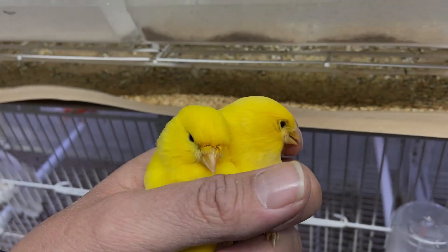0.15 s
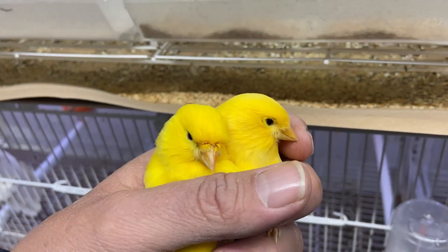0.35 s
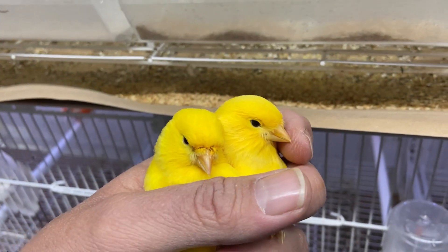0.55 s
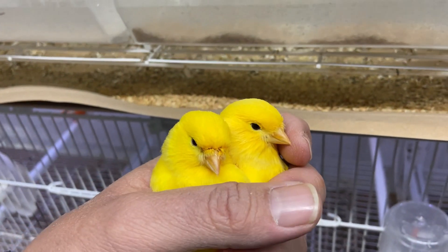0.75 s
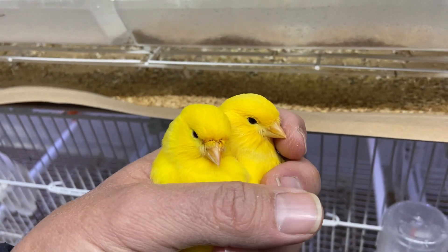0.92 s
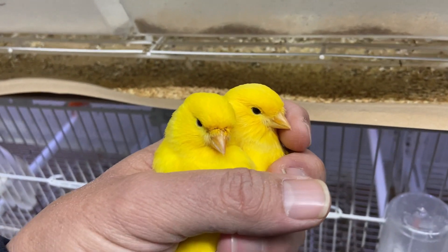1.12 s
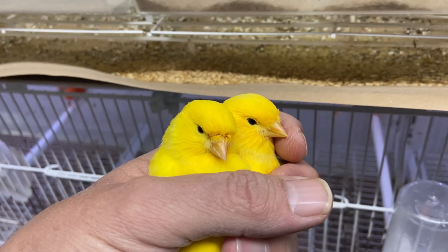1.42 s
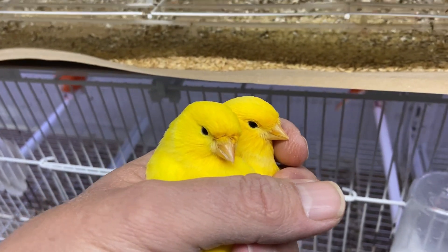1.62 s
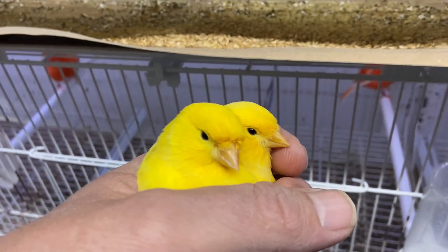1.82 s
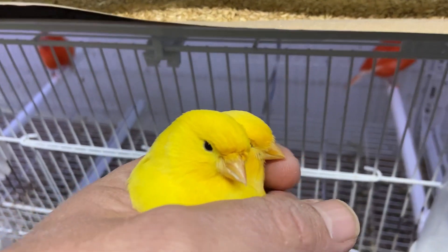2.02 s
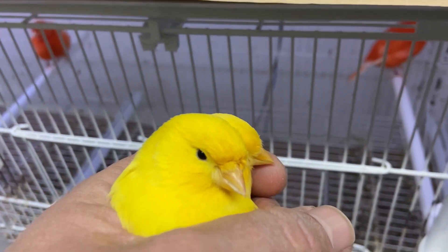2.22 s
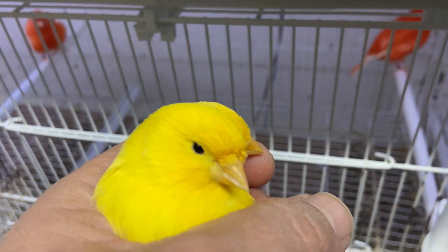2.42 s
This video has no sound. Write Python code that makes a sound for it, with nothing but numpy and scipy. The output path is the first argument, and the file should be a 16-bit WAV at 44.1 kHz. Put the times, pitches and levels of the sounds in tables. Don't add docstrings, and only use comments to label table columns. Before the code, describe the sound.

Canary's rapid steady trill of dropping whistled notes, with neighbouring birds chirping, rustle and low rumble

```python
import sys
import numpy as np
from scipy import signal
from scipy.fft import rfft, irfft
from scipy.io import wavfile
from scipy.ndimage import uniform_filter1d

SR = 44100
rng = np.random.default_rng(int(sys.argv[2]) if len(sys.argv) > 2 else 0)


def wav_out(sig):
    wavfile.write(sys.argv[1], SR, np.round(np.clip(np.atleast_2d(sig).T, -1, 1) * 32767).astype(np.int16))


def volts_from_db(level):
    exponent = np.asarray(level, float) / 20
    return 10 ** exponent


N = 112454

# (frequency [Hz], left-right likeness [0-1])
COHERENCE = [(60, 0.99), (200, 0.86), (500, 0.072), (1500, 0.017), (3000, 0.92), (6000, 0.27)]


def evened(x):
    return x / np.sqrt(np.mean(x ** 2) + 1e-20)


def wander(chance, *sizes):
    for size in sizes:
        chance = uniform_filter1d(chance, size=size)
    return evened(chance)


def read(points, hz):
    f, value = np.transpose(points)
    return np.interp(np.log(hz + 1), np.log(f + 1), value)


def partly_alike(left, other, same):
    return same * left + np.sqrt(1 - same ** 2) * other


def add(mix, s, sound):
    part = mix[round(s * SR):][:len(sound)]
    part += sound[:len(part)]


def tones(hz, partials):
    turns = np.cumsum(hz) / SR + rng.random()
    wobble = 0.45 * wander(rng.standard_normal((len(partials), len(hz))), 70)
    out = 0
    for (k, db), phase in zip(partials, wobble):
        audible = k * hz < SR / 2.2
        out = out + volts_from_db(db) * np.sin(2 * np.pi * k * turns + phase * (k * hz > 6600)) * audible
    return np.sqrt(2) * out


def placed(x, pan_db, wet_db):
    # (frequency [Hz], T60 [s])
    decay_times = [(1500, 0.13), (3000, 0.22), (6000, 0.12), (12000, 0.068)]
    # (delay [s], left [dB], right [dB])
    reflections = [
        (.0045, -8.5, -3),
        (.009, -7.5, -2.5),
        (.031, -6.5, -7),
    ]
    taps = np.zeros((2, 24000))
    at = np.arange(200, 23980, 20) + rng.integers(0, 20, (2, 1189))
    np.put_along_axis(taps, at, rng.choice([-1., 1.], at.shape), 1)
    hz, t, z = signal.stft(taps, SR, nperseg=256)
    decay = volts_from_db(-60 * t / read(decay_times, hz)[:, None])
    response = signal.istft(z * decay, SR, nperseg=256)[1]
    response[1] = partly_alike(response[0], response[1], 0.52)
    side = volts_from_db(np.array([pan_db, -pan_db]) / 2)
    response *= volts_from_db(wet_db) / np.linalg.norm(response[0]) * np.sqrt(side)[:, None]
    response[:, 0] += side
    for k, (s, left_db, right_db) in enumerate(reflections):
        arrivals = [round(s * SR), round(s * SR * 1.07)]
        response[[0, 1], arrivals] += (-1) ** k * side * volts_from_db(np.array([left_db, right_db]) + wet_db)
    return signal.fftconvolve(x[None], response, axes=1)[:, :N]


def trill():
    # (start [s], hold [s], level [dB], accent at the drop [dB])
    notes = [(.002, 0.029, -42, 9.5), (0.085, 0.051, -28, -5), (0.192, 0.04, -26, -2),
             (0.292, 0.035, -23, -8), (0.389, 0.038, -25, -3), (0.504, 0.019, -21.5, -9),
             (0.601, .022, -23, -12.5), (0.685, 0.03, -26, -2), (.780, 0.038, -26.5, -4.5),
             (0.886, 0.031, -26, -3), (0.983, 0.036, -31, 5), (1.086, 0.041, -35, 7.5),
             (1.179, 0.041, -33.5, 8.5), (1.296, 0.034, -34, 8.5), (1.400, 0.057, -34.5, 9),
             (1.509, 0.047, -47, 22), (1.628, 0.0314, -35.5, 8), (1.734, 0.039, -34.5, 5.5),
             (1.837, 0.042, -34.5, 8), (1.946, 0.032, -38.5, 11), (2.052, 0.041, -32, 6),
             (2.157, 0.037, -38.5, 14), (2.267, 0.037, -34, 10.5), (2.376, 0.034, -30.5, 3),
             (2.48, 0.04, -33, 5)]
    # (time [s], pitch [Hz], sag of the hold [Hz], depth of the drop [Hz],
    # swell into the catch [dB])
    phrase = [
        (0, 2781, -12, 95, 1),
        (0.083, 3033, 37.5, 390, -16.5),
        (0.298, 3077, 7, 532, -22.5),
        (0.599, 3049, 4.5, 538, -9),
        (1, 2999, 53, 483, -5.5),
        (1.5, 3000, 118, 498, -2.5),
        (2.55, 2996, 128.5, 517, -4),
    ]
    # (multiple, level [dB])
    partials = [(1, 2.5), (2, -29.5), (3, -29.5), (4, -32)]
    rise_s, drop_s, end_s = .009, .034, 0.0055
    scoop_hz, drop_bend = 29.6, 0.813
    catch_db, catch_s = -9.5, .004
    accent_at_s, accent_s = 0.0079, 0.0041
    drop_db, drop_fade_db = -14, -10.5
    out, (s, *laws) = np.zeros(N), np.transpose(phrase)
    chance = rng.standard_normal(N)
    waver = volts_from_db(1.2 * wander(chance, 400, 300))
    grain = wander(chance, 110, 70)
    for start, hold, db, accent_db in notes:
        top_hz, sag, depth, swell_db = (np.interp(start, s, law) for law in laws)
        t = np.arange(0, hold + drop_s, 1 / SR)
        held = np.minimum(t / hold, 1)
        drop = np.clip((t - hold) / drop_s, 0, 1)
        hz = top_hz + scoop_hz * np.exp(-t / rise_s) - sag * held ** 2 - depth * drop ** drop_bend
        off_accent = 1 - np.exp(-((t - hold - accent_at_s) / accent_s) ** 2)
        falling_db = accent_db + drop_fade_db * drop ** 2 + drop_db * off_accent
        level = db + np.where(t < hold, swell_db * (1 - held), falling_db)
        level = uniform_filter1d(level, size=190) + catch_db * np.exp(-((t - hold) / catch_s) ** 2)
        edge = np.sin(np.pi / 2 * np.minimum(t / rise_s, 1)) * np.minimum((t[-1] - t) / end_s, 1)
        edge *= 1 + 0.6 * np.sqrt(drop) * np.resize(grain[round(start * SR):], len(t))
        voice = tones(hz, [(k, d - 12 * drop * (k == 2)) for k, d in partials])
        add(out, start, edge * volts_from_db(level) * voice)
    return placed(out * waver, pan_db=8, wet_db=-6.5)


def followed(table):
    s, *cols = np.transpose(table)
    t = np.arange(s[0], s[-1], 1 / SR)
    return s[0], [np.interp(t, s, c) for c in cols]


def arched_chirp():
    # (time [s], frequency [Hz], level [dB])
    arch = [
        (1.148, 5083, -58),
        (1.16, 5500, -36.5),
        (1.172, 5900, -40.5),
        (1.187, 6076, -41.5),
        (1.2, 6120, -38.5),
        (1.213, 5790, -38.5),
        (1.228, 5490, -59),
        (1.25, 4850, -46),
    ]
    # (multiple, level [dB])
    partials = [(.5, -23), (1, 2), (1.5, -29), (2, -18), (2.5, -18)]
    out = np.zeros(N)
    s, (hz, db) = followed(arch)
    rough = 1 + 0.4 * wander(rng.standard_normal(len(hz)), 7)
    add(out, s, volts_from_db(db) * tones(hz, partials) * rough)
    return out


def flat_whistle():
    # (time [s], pitch [Hz], level [dB], octave over fundamental [dB])
    whistle = [
        (1.214, 2325, -64, 12),
        (1.226, 2343, -52, 26),
        (1.25, 2345, -51, 28),
        (1.287, 2343, -50, 28),
        (1.298, 2335, -56, 10),
        (1.32, 2310, -50, -5),
        (1.335, 2303, -39, -22),
        (1.365, 2295, -39, -20),
        (1.41, 2285, -62, -20),
    ]
    # (multiple, level [dB])
    upper_partials = [(3, 5), (4, 3), (5, 3), (6, -11)]
    out = np.zeros(N)
    s, (hz, db, octave_db) = followed(whistle)
    upper = [(k, octave_db - 29.5 + d) for k, d in upper_partials]
    add(out, s, volts_from_db(db) * tones(hz, [(1, 0.017), (2, octave_db)] + upper))
    return out


def short_chirps():
    # (start [s], length [s], first frequency [Hz], last
    # frequency [Hz], level [dB])
    chirps = [(0.193, 0.079, 6150, 6114, -60), (0.27, 0.043, 3950, 4000, -61),
              (1.198, .032, 3350, 3770, -41), (1.216, 0.025, 5650, 5410, -36),
              (1.262, 0.014, 5000, 2300, -35.5), (1.279, 0.027, 4900, 4010, -36.5),
              (1.4, 0.027, 2500, 4600, -36.5), (1.21, 0.038, 5160, 4100, -34.5),
              (1.334, 0.026, 3990, 4090, -33), (1.36, .04, 4060, 4050, -51.5),
              (1.4, 0.034, 3595, 3590, -36.5), (1.205, .03, 4500, 4900, -41), (1.222, .03, 3100, 4500, -43),
              (1.33, 0.021, 5900, 4000, -53), (1.8, 0.017, 2100, 4200, -38), (.385, 0.027, 2800, 1800, -57),
              (2.4, 0.023, 1900, 2150, -51), (1.456, 0.0055, 3610, 3420, -42.5),
              (1.7, 0.025, 4850, 4950, -55.5), (1.577, 0.026, 3360, 3116, -53),
              (1.5, 0.019, 4700, 5300, -57), (.480, 0.021, 3080, 3044, -42.5),
              (0.58, 0.013, 3400, 3000, -44.5), (2.188, 0.012, 3586, 3540, -47),
              (2.188, 0.03, 4050, 4070, -57)]
    # (multiple, level [dB])
    partials = [(1, 2), (2, -14), (3, -14.5), (4, -20)]
    out = np.zeros(N)
    for start, length, first_hz, last_hz, db in chirps:
        u = np.arange(0, 1, 1 / (length * SR))
        envelope = np.sin(np.pi * u) ** 0.6 * volts_from_db(db)
        add(out, start, envelope * tones(first_hz + (last_hz - first_hz) * u, partials))
    return out


def neighbours():
    arch, flat, small = arched_chirp(), flat_whistle(), short_chirps()
    flutter = 1 + 0.45 * wander(rng.standard_normal(N), 90)
    breath = signal.lfilter(*signal.butter(2, 3400, "high", fs=SR), rng.standard_normal(N))
    small = small + volts_from_db(-24) * breath * uniform_filter1d(abs(arch + flat + small), size=200)
    wet_db = -10
    return placed(arch, 10, wet_db) + placed(flat, 7, wet_db) + placed(small * flutter, 6.5, wet_db)


def ticks():
    # (time [s], level [dB])
    impacts = [
        (0.462, -51),
        (0.502, -45),
        (.689, -40.5),
        (1.019, -58.5),
        (1.155, -56),
        (1.459, -52),
        (1.5069, -48),
        (1.558, -48),
        (2.142, -41.5),
        (2.184, -42),
    ]
    out, t = np.zeros(N), np.arange(2000) / SR
    for s, db in impacts:
        add(out, s, volts_from_db(db - 60 * t / 0.025) * rng.standard_normal(2000))
    bright = signal.lfilter(*signal.butter(1, 2500, "high", fs=SR), out)
    return placed(bright, pan_db=6.8, wet_db=-3.0)


def noise(db, patchy_db):
    a, b, c, d, p = rng.standard_normal((db.shape[1], 257, 5)).T
    patches = evened(uniform_filter1d(uniform_filter1d(p, size=8, axis=0), size=14, axis=1))
    same = read(COHERENCE, np.fft.rfftfreq(512, 1 / SR))[:, None]
    left = a + 1j * b
    z = np.array([left, partly_alike(left, c + 1j * d, same)]) * volts_from_db(db + patchy_db * patches)
    return evened(signal.istft(z, nperseg=512, noverlap=384)[1][:, :N])


def rustle():
    # (frequency [Hz], density [dB per Hz])
    spectrum = [(150, -6), (600, -11), (1300, -7.5), (2500, -11), (3800, -20), (6000, -17.5), (12000, -20),
                (15500, -20.5)]
    # (time [s], level [dB])
    activity = [(0, -61.5), (.15, -69), (.25, -63.5), (.33, -70), (.62, -68), (.688, -51.5), (.86, -54.5),
                (1.05, -69.5), (1.2, -68.5), (1.4, -68), (1.55, -60.5), (1.65, -61), (1.8, -63),
                (2.08, -67), (2.16, -59), (2.3, -64.5), (2.5, -60.5)]
    t, hz = np.arange(N // 128 + 5) * 128 / SR, np.fft.rfftfreq(512, 1 / SR)
    follow = read([(2000, 1.02), (4000, 0.88), (6000, 0.25)], hz)[:, None]
    flicker = wander(rng.standard_normal(len(t)), 5)
    bustle = np.interp(t, *np.transpose(activity)) + 62 + flicker
    shape = read(spectrum, hz) - 30 * (hz < 120)
    return volts_from_db(-51.5) * noise(shape[:, None] + follow * bustle, patchy_db=4.5)


def rumble():
    # (frequency [Hz], density [dB per Hz])
    spectrum = [(20, -43), (40, 3), (60, 3.5), (108, 1.5), (135, -5.5), (250, -9.5), (500, -16)]
    # (time [s], level [dB])
    handling = [
        (0, -58),
        (.6, -66.5),
        (0.718, -52),
        (1.249, -58),
        (1.33, -49),
        (1.9, -49),
        (2.1, -55.5),
        (2.35, -56),
        (2.55, -46.5),
    ]
    low = signal.lfilter(*signal.butter(4, 900, fs=SR), rng.standard_normal((2, N)))
    hz = np.fft.rfftfreq(N, 1 / SR)
    z = rfft(low)
    z[1] = partly_alike(z[0], z[1], read(COHERENCE, hz))
    low = evened(irfft(z * volts_from_db(read(spectrum, hz)), N))
    return low * volts_from_db(np.interp(np.arange(N) / SR, *np.transpose(handling)) + 2.28)


def scene():
    return trill() + neighbours() + ticks() + rustle() + rumble()


def low_pass(x):
    return signal.sosfilt(signal.butter(12, 16580, fs=SR, output="sos"), x)


def record(dry):
    # (frequency [Hz], left lead [rad])
    port_phase = [(7900, 0), (8600, -2.95), (9600, -3.3), (11000, -6.28), (12700, -9.2), (13700, -9.65),
                  (15200, -12.56)]
    # (from [s], to [s])
    gaps = [
        (1.4373, 1.4578),
        (1.4797, 1.5053),
    ]
    z, hz, t = rfft(dry), np.fft.rfftfreq(N, 1 / SR), np.arange(N) / SR
    middle = z.mean(0)
    z = middle + (z - middle) * read([(7000, 1), (7800, .15)], hz)
    z *= np.clip((15900 - hz) / 100, 0, 1)
    z[1] *= np.exp(-1j * np.interp(hz, *np.transpose(port_phase)))
    lost = uniform_filter1d(sum(1. * ((t > a) & (t < b)) for a, b in gaps), size=5)
    return low_pass(irfft(z, N) * (1 - lost * (1 - volts_from_db(-100))))


dry = scene()
out = record(dry)
wav_out(out)
```